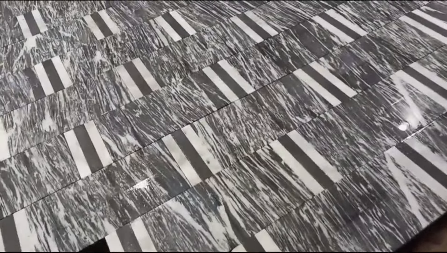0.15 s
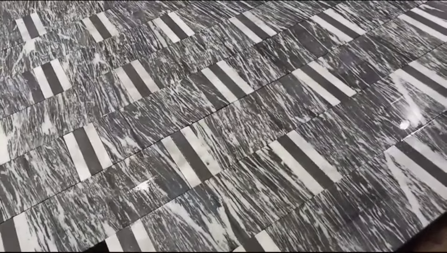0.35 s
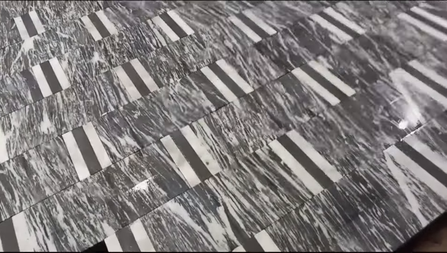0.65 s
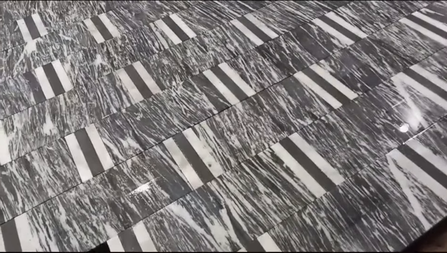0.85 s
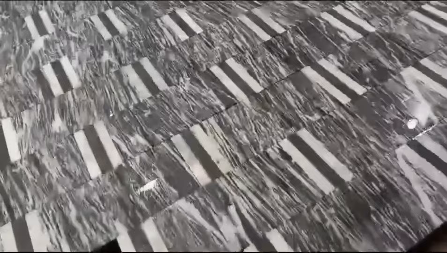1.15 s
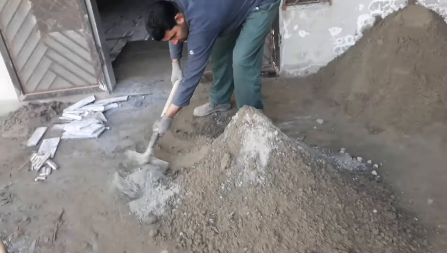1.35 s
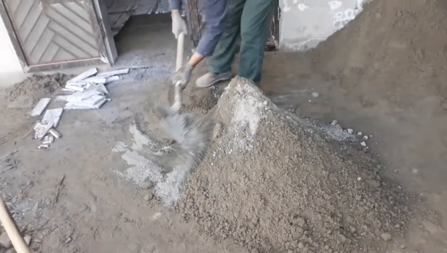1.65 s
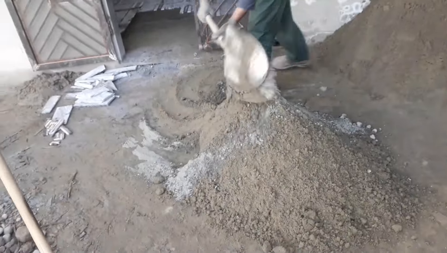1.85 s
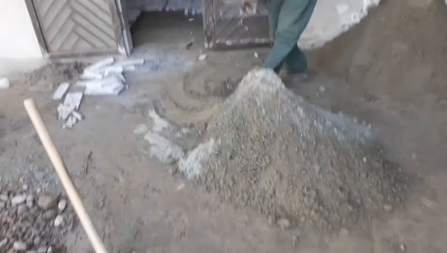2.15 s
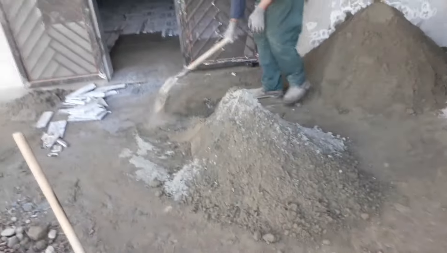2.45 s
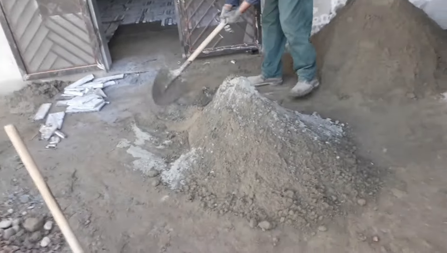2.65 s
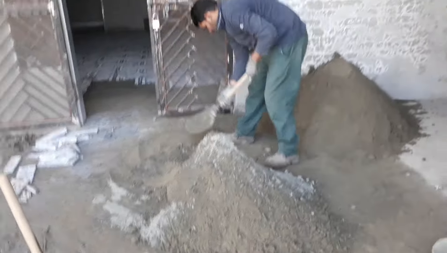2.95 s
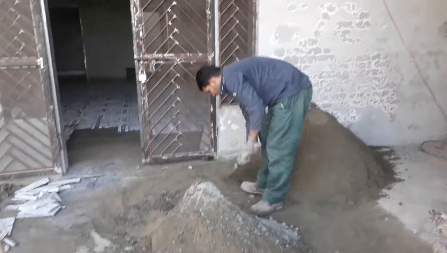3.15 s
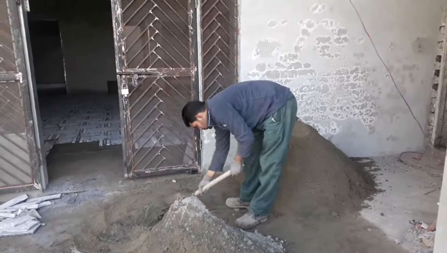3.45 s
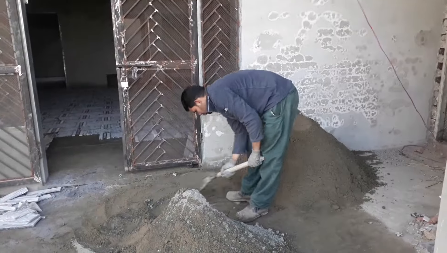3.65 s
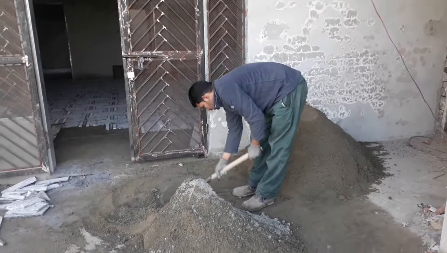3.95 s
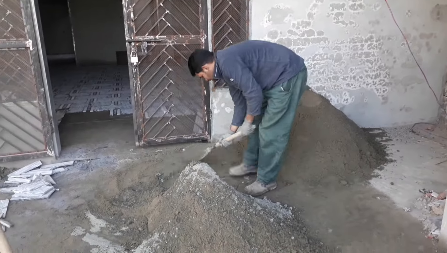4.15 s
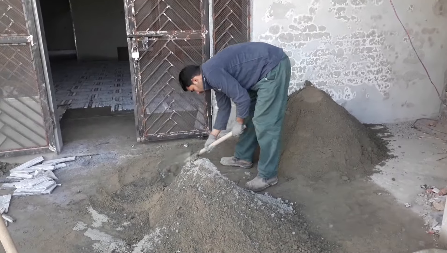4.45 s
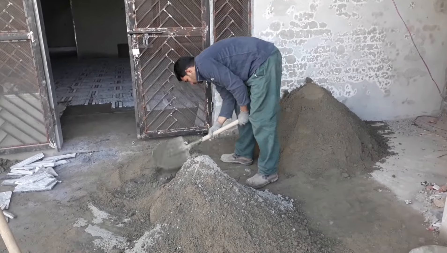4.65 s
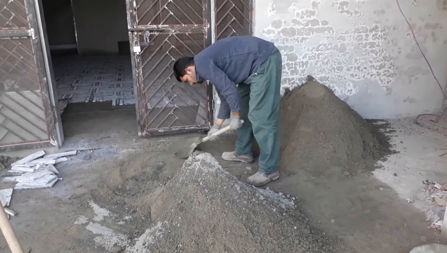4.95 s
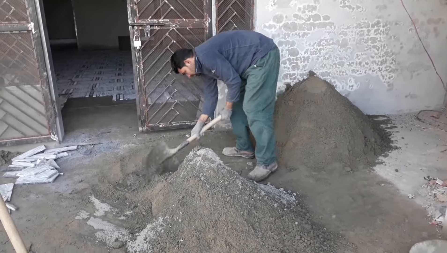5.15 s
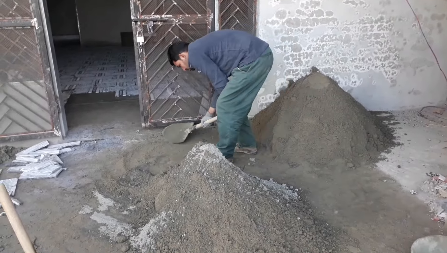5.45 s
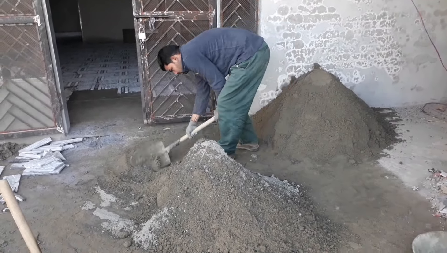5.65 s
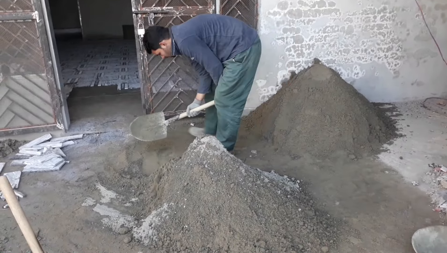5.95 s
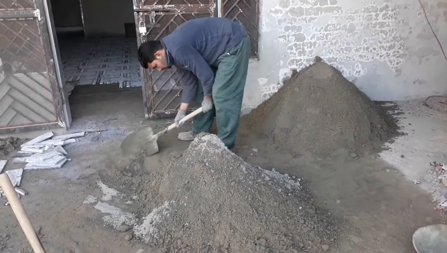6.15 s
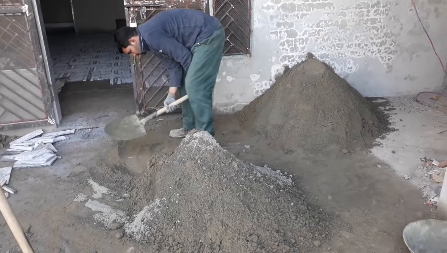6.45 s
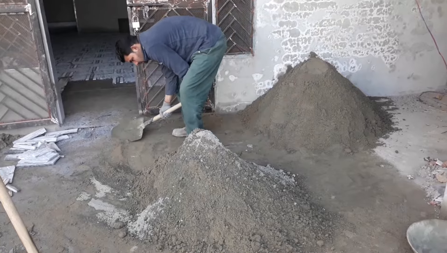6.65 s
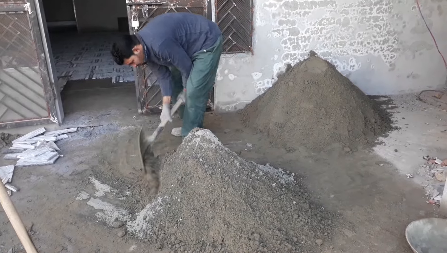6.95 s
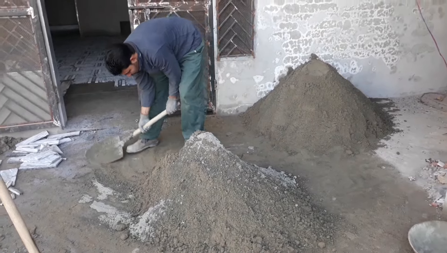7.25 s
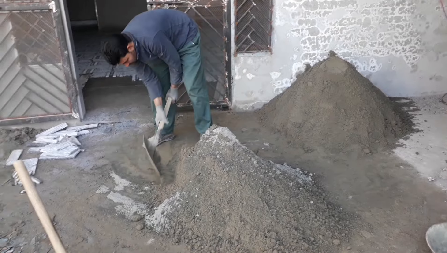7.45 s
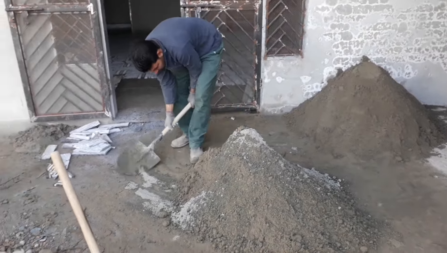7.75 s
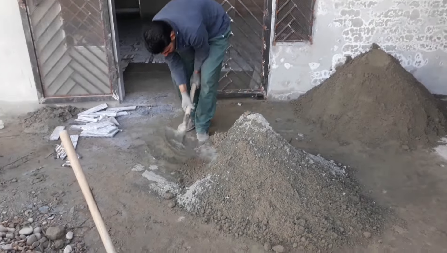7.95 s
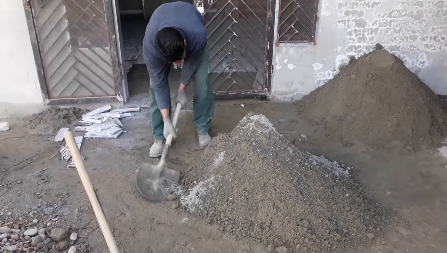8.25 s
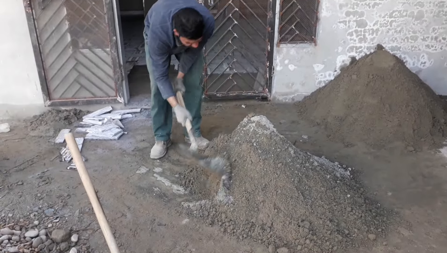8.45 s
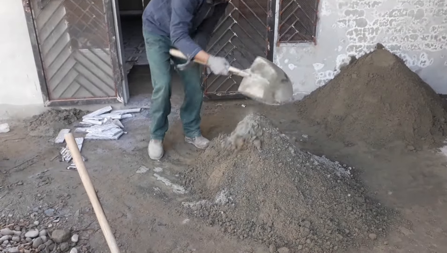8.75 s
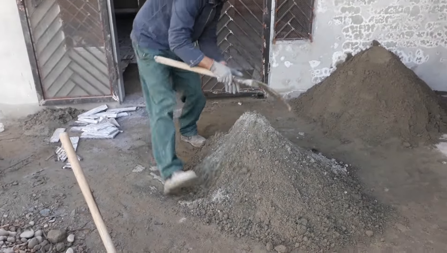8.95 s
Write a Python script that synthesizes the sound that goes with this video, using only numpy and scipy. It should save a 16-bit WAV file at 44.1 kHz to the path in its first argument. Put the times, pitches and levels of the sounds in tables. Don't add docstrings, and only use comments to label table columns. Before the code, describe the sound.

A very quiet tiled room with a faint footstep and rustle lasts about a second, then cuts to a walled building yard. A steel shovel scrapes briefly, a plank knocks hard and bounces, sand pours, then regular harsh gritty strokes ring the blade on concrete, strongest in the middle. Sand slides softly between them. Close small microphone, short yard echo, faint distant site noise.

```python
import sys
import numpy as np
from scipy import signal
from scipy.fft import rfft, irfft, next_fast_len
from scipy.io import wavfile

SR = 44100
rng = np.random.default_rng(int(sys.argv[2]) if len(sys.argv) > 2 else 0)


def nominal_scale(level):
    x = np.asarray(level, float) / 20
    return 10 ** x


def unload_audio(sound):
    columns = np.transpose(np.atleast_2d(sound))
    steps = np.round(np.clip(columns, -1, 1) * 32767)
    wavfile.write(sys.argv[1], SR, steps.astype(np.int16))


N = 400869

# time_s, grit_db, blade_body_rel_db, blade_low_rel_db
STROKES = [
    [(1.226, -55, 14, -1), (1.244, -45, 3.5, -1), (1.37, -42.5, 5.5, 2), (1.48, -49.5, 15, 0.5),
     (1.5, -76, 1, -6)],
    [(3.22, -37, -13, 12), (3.23, -50.5, 2, 3), (3.308, -35, 3, -10), (3.448, -32.5, 0, -8.5),
     (3.52, -54, 11, -10)],
    [(3.75, -29, 0.5, -2.5), (3.76, -52, 9, -6), (3.802, -28.5, -1, -33), (3.948, -30, 0.5, -12),
     (4.01, -45, -4, -11)],
    [(4.26, -53, -2, 8), (4.318, -36.5, 0, -9), (4.436, -31.5, 4, 1), (4.544, -36, 5, -15),
     (4.558, -29.5, -5, -28), (4.6, -52, 2, -2)],
    [(4.87, -41, 6, -11), (4.876, -50, 2, -8), (4.888, -31.5, 0.5, -7), (5.108, -32, 2, -3),
     (5.15, -52, -3, -18)],
    [(5.43, -20.5, -24, -11), (5.438, -38, 3, -7), (5.484, -33.5, -0.5, -9.5), (5.666, -30, 4, 0.5),
     (5.704, -27, 0, -7), (5.75, -56, 9, -2)],
    [(6.065, -36, -3, -12), (6.115, -35, 3.5, -1), (6.201, -31.5, -3, -2.5), (6.267, -31, 1, 0.5),
     (6.33, -59, 9, -18)],
    [(6.61, -46, 2, -7), (6.64, -42.5, 4.5, -17), (6.664, -35.5, 2, -6.5), (6.824, -31.5, 1.5, 0),
     (6.852, -32.5, 0, -2.5), (6.93, -53.5, 10, -9)],
    [(7.23, -45.5, -8, -14), (7.29, -42, 10, -4), (7.33, -37, 4, -0.5), (7.398, -30, -2, -5.5),
     (7.47, -55, 6, -21)],
    [(7.705, -48.5, -9, 0), (7.765, -40, 3, -6), (7.819, -31, 4.5, 1.5), (7.853, -32, 3.5, -19),
     (7.92, -61, -1, -2)],
    [(8.11, -48.5, -3, -4), (8.202, -32, 1.5, -9), (8.272, -34, 0, -6), (8.362, -46, -2, -2),
     (8.39, -73, 6, -5)],
]
# start_s, peak_db, thud_rel_db, low_rel_db, bright_rel_db, dies_s
JOLTS = [(1.357, -25, -14, 2, -17, 0.12), (1.449, -18, -24, -28, -32, 0.08),
         (2.0887, -37.5, -37, -3, -28, 0.097), (2.2424, -43, 4, 15, 1, 0.044),
         (3.2115, -20, -1, -5, -3, 0.05), (3.2794, -17.5, -54, -18, -3, 0.068),
         (3.7448, -18, -3, -4, 1, 0.041), (3.7753, -21, -10, -23, 4, 0.033),
         (3.7988, -16, -21, -27, -7, 0.021), (3.8397, -15.5, -12.5, -18, -11, 0.15),
         (3.896, -22, -15, -1.5, -15, 0.15), (3.9174, -16.5, -40, -21, -5, 0.15),
         (4.251, -24, -1, -14, -11, 0.068), (4.3077, -19, -31, -27, -12, 0.071),
         (4.3324, -13.5, -35, -21, -11, 0.087), (4.5187, -15, -37, -3, -0.5, 0.074),
         (4.8653, -22, -26, -26, -1, 0.047), (4.8864, -12, -31, -18, -5, 0.037),
         (4.9394, -9, -32, -23, -11, 0.065), (4.9826, -10, -21, -16, -11, 0.04),
         (5.423, -9.5, -33, -14, -1, 0.035), (5.6374, -7, -33, -8, -12, 0.039),
         (6.1879, -6, -15.5, -11, -3, 0.052), (6.6037, -25.5, 7, 5.5, -4, 0.027),
         (6.626, -23, -17, -19, -6, 0.065), (6.7371, -22, -22, -12, 4, 0.056),
         (7.227, -20, -4, -7.5, 4.5, 0.028), (7.277, -19.5, -26, -24, -16, 0.078),
         (7.4006, -15, -24, -32, -5, 0.08), (7.6988, -32, 14.5, 1, -6, 0.047),
         (7.7385, -23.5, -13, -15, -2, 0.055), (7.788, -19.5, -24, -17, 2, 0.11),
         (8.106, -24, -19, -16, -10, 0.063), (8.1244, -26, -22, -23, -10, 0.059),
         (8.1623, -15, -12, -22, -18, 0.05), (8.2297, -16, -24, -11.5, -12, 0.15),
         (8.2544, -16, -33, -22, -9, 0.15), (8.9904, -39.5, 1, -16, -5, 0.045)]
SCRAPE_EDGES_HZ = [60, 480, 1200, 4500, 16000]
# pitch_hz, width_hz, level_db
BLADE_MODES = [(677.7, 37, -5.5), (844.6, 32, 0.5), (1363, 56, -8.5), (1659, 59, -0.5), (2119, 84, 2),
               (2448, 120, -1), (3250, 210, -14.5), (3990, 58, -9.5), (4790, 50, -30), (6800, 550, -3)]
# pitch_hz, level_db (per Hz)
GRIT_COLOUR = [(35, -50), (60, -30), (164, -18.5), (566, -13.5), (682, -5.5), (1060, -7.5), (2470, -1.5),
               (2770, -2.5), (4530, -5.5), (7060, -6.5), (9570, -19.5), (12100, -21), (16000, -35)]
# time_s, hiss_db, coarse_rel_db, dust_rel_db
SAND_FALLS = [
    [(1.5, -62, 11, -17), (1.604, -65, 22, -18), (1.628, -58, 12, -17), (1.966, -65, 8, -19),
     (2.164, -76, 14, -9), (2.198, -48.5, -13, -8), (2.278, -67.5, 19, -10), (2.318, -72, 6, -10)],
    [(2.52, -62, 2, -14), (2.54, -45, 16.5, -19), (2.674, -53.5, 12, -7), (2.884, -50, 2, 0),
     (3.032, -38, 6, -21), (3.13, -61, 5, -1), (3.2, -68, 0, -2)],
    [(6.36, -63, 8, -14), (6.508, -63, 5, 3), (6.544, -52.5, 1, -13), (6.59, -67, 25, 5)],
    [(6.96, -58, 27, -16), (7.092, -65, 10, -8), (7.12, -54.5, 6, -2), (7.21, -59, 6, -11)],
    [(7.5, -68, 6, -16), (7.616, -77, 8, -9), (7.682, -55, 0, -3), (7.69, -75, 1, -7)],
    [(7.94, -73, 7, -21), (8.01, -62, 17, -19), (8.03, -59, 9, -22), (8.09, -56, 15, -22)],
    [(8.42, -72, 0, -11), (8.478, -72, 1, -11), (8.636, -62.5, 2, -14), (8.676, -46.5, -8, 13),
     (8.832, -72, -13, -7), (8.968, -72, 13, 2), (9.09, -48, -8, 2)],
]
# pitch_hz, level_db (per Hz)
SAND_COLOUR = [(1500, 10), (2800, 6), (3600, 0.5), (4300, -3), (5300, -14), (7100, -2.5), (8000, -18.5),
               (8600, -19), (11700, -6), (15500, -8)]
# start_s, blow_db, hardness_hz, clatter_db, clatter_dies_s
KNOCKS = [
    (2.3343, -8, 7000, -15.5, 0.067),
    (2.3368, -12, 1500, -17, 0.095),
    (2.347, -9, 910, -29, 0.38),
    (2.531, -27, 4960, -26.5, 0.11),
    (2.538, -19, 3000, -28, 0.12),
    (2.547, -16, 1250, -29.5, 0.34),
    (2.629, -35, 4000, -37, .1),
]
# pitch_hz, level_db, t60_s
PLANK_MODES = [(163, -4.5, 0.068), (210, -3.5, 0.088), (293, -8.5, 0.059), (505, -10.5, 0.039),
               (567, -3.5, 0.091), (610, 3.5, 0.074), (783, -5, 0.047), (1082, -14, 0.057),
               (1440, -16, 0.042), (1546, -9, .07), (2300, 3, 0.017), (2520, 6, 0.015), (4020, -1.5, 0.019),
               (6960, -0.5, .012)]
# pitch_hz, level_db (per Hz)
CLATTER_COLOUR = [(41, -40), (70, -10.5), (308, -5.5), (403, -17), (578, -1), (969, -14.5), (1550, -16),
                  (1820, -18.5), (6830, -25), (15000, -52)]
# start_s, pitch_hz, level_db, t60_s
PINGS = [
    (1.98, 4800, -64, .1),
    (2.0, 2800, -64, .1),
    (2.03, 3100, -60, .3),
    (2.091, 2891, -57, 30.0),
    (8.9, 4000, -63, .4),
    (8.95, 3850, -59, .4),
    (8.975, 2500, -54, .25),
]
# time_s, rumble_db
RUMBLE = [
    [(1.24, -56), (1.336, -56), (1.35, -34.5), (1.458, -53.5), (1.55, -82)],
    [(2.85, -52.5), (2.926, -58), (2.984, -44), (3.13, -67), (3.15, -65)],
]
# time_s, level_db
SWISH = [
    (2.88, -60),
    (2.992, -37),
    (3.036, -38),
    (3.076, -42),
    (3.11, -74),
]
# pitch_hz, width_hz, level_db
SOLE_MODES = [(3620, 650, 1.2), (7280, 610, 1)]
# time_s, level_db, pitch_hz
CHIRP = [
    (4.117, -77, 5560),
    (4.125, -45, 6200),
    (4.147, -45, 6080),
    (4.15, -59, 5970),
    (4.16, -48, 5900),
    (4.2, -66, 5800),
]
# pitch_hz, t60_s, level_db
YARD_ECHO = [(116, 0.72, -19.5), (370, 0.79, -18.5), (1080, 0.82, -17), (2270, 0.8, -18.5),
             (4860, 0.46, -17.5), (7000, 0.15, -31), (11900, 0.55, -37)]
# pitch_hz, level_db (per Hz)
SITE_COLOUR = [(15, -36), (25, -17), (49, -8), (157, 1.5), (363, -1), (503, -9), (1230, -6.5), (1440, -8.5),
               (5570, -17.5), (6920, -17.5), (9320, -29), (14800, -29), (16000, -38)]
# time_s, rustle_db, hum_rel_db
INDOORS = [(0.0, -68, -2), (0.116, -80, -1), (0.196, -77, 0), (0.204, -71.5, -11), (0.264, -80.5, 3),
           (0.354, -75, 6), (0.364, -58, 2.5), (0.524, -75.5, 0), (0.562, -73, 4), (0.654, -85, 5),
           (0.892, -82.5, 4), (0.914, -89, 19), (1.1, -84, -4), (1.11, -91, 19)]
# pitch_hz, level_db (per Hz)
RUSTLE_COLOUR = [(350, -48), (600, -13), (1160, -12), (2070, -8.5), (2540, -13), (5120, -19.5), (8050, -33),
                 (8990, -31), (16000, -58)]
# pitch_hz, level_db (per Hz)
HUM_COLOUR = [(15, -51), (25, -21), (64, -6), (109, 1.5), (494, -11), (549, -10), (900, -24), (1170, -48),
              (1980, -120)]
# start_s, thud_hz, thud_db, t60_s, scuff_db
STEPS = [
    (0.362, 172, -49, 0.18, -59),
    (0.922, 148, -71, 0.12, -78),
    (1.125, 104, -47, 0.44, -65),
]
# start_s, pitch_hz, level_db, t60_s
SQUEAKS = [
    (.004, 1495, -76, .5),
    (.385, 8750, -74, .08),
    (.365, 2000, -66, .3),
    (.535, 3050, -74, .35),
]

SITE_DB = -54
THUD_END_S, ROOM_END_S, SITE_START_S, FADE_IN_S = 1.15, 1.197, 1.224, 0.015
MIC_LOW_HZ, MIC_TOP_HZ = 32, 15800


def shovel():
    live, grit_db, body_db, low_db = in_time(STROKES)
    chatter = nominal_scale(2.11 * drift(31.7) + 1.23 * drift(113))
    range_db = (low_db - 10, low_db - 4.0, body_db - 2.0, -1.5)
    power = [live * (nominal_scale(grit_db + rel) * chatter) ** 2 for rel in range_db]
    for s, db, thud, low, bright, dies_s in JOLTS:
        for total, rel, longer in zip(power, (thud, low, 0, bright), (1.6, 0.71, 0.71, 0.6)):
            add_power(total, s - .0015, max(dies_s, .005) * longer, .003, nominal_scale(db - 6.5 + rel))
    grit = colour(grains(per_s=9000, spread_db=3.0), GRIT_COLOUR)
    ranges = [rms_one(band(grit, a, b)) for a, b in zip(SCRAPE_EDGES_HZ, SCRAPE_EDGES_HZ[1:])]
    direct = sum((-1) ** k * np.sqrt(p) * x for k, (p, x) in enumerate(zip(power, ranges)))
    return nominal_scale(-3.5) * direct + blade(direct)


def blade(drive):
    main = np.zeros(N)
    for hz, width_hz, db in BLADE_MODES:
        main += resonate(drive * nominal_scale(db + 1.5 + 2.25 * drift(21.4)), hz, width_hz)
    small = np.zeros(N)
    small_hz = np.geomspace(1000, 13000, num=24) * nominal_scale(rng.normal(0, .2, size=24))
    for k, hz in enumerate(small_hz):
        small += (-1) ** k * resonate(drive * nominal_scale(5.35 * drift(30)), hz, 30 + .025 * hz)
    return main + nominal_scale(-8.5) * small


def sand():
    live, hiss_db, coarse_db, dust_db = in_time(SAND_FALLS)
    fall = colour(grains(per_s=12000, spread_db=3.0), SAND_COLOUR)
    coarse = rms_one(band(fall, 1500, 5200))
    fine = rms_one(band(fall, 5200, 8600))
    dust = rms_one(band(fall, 8600, 16000))
    mixture = fine - nominal_scale(coarse_db - 11.0) * coarse - nominal_scale(dust_db - 11.2) * dust
    return live * nominal_scale(hiss_db + 2.8 * drift(42)) * mixture


def plank():
    force, power = np.zeros(N), np.zeros(N)
    for s, db, hard_hz, clatter_db, dies_s in KNOCKS:
        softening = signal.butter(2, hard_hz, fs=SR, output="sos")
        click = signal.sosfilt(softening, np.arange(400) == 0)
        force[round(s * SR):][:len(click)] += nominal_scale(db) * click
        add_power(power, s, dies_s, .0015, nominal_scale(clatter_db + 1.5))
    wood = sum((-1) ** k * nominal_scale(db - 7) * ring(force, hz, t60) for k, (hz, db, t60) in enumerate(PLANK_MODES))
    clatter = colour(grains(per_s=10000, spread_db=3.5), CLATTER_COLOUR)
    return band(wood, 95, 10000) + np.sqrt(power) * clatter


def pings():
    t = np.arange(N) / SR
    knock_s = KNOCKS[0][0]
    out = np.zeros(N)
    for s, hz, db, t60 in PINGS:
        undamped = (t < knock_s) | (s > knock_s)
        out += nominal_scale(db) * burst(s, t60, rise_s=0.0017) * undamped * np.sin(2 * np.pi * hz * t)
    return out


def boots():
    shifting, rumble_db = in_time(RUMBLE)
    moving, swish_db = in_time([SWISH])
    dust = grains(per_s=20000, spread_db=5.5)
    sole = np.zeros(N)
    for hz, width_hz, db in SOLE_MODES:
        sole += nominal_scale(db) * rms_one(resonate(resonate(dust, hz, width_hz), hz, width_hz))
    rumble = rms_one(band(rng.standard_normal(N), 176, 430))
    return shifting * nominal_scale(rumble_db - 1.5) * rumble + moving * nominal_scale(swish_db - 3.5) * sole


def sparrow():
    live, db, hz = in_time([CHIRP])
    warble_hz = 250 * np.sin(2 * np.pi * 150 * np.arange(N) / SR)
    return live * nominal_scale(db) * np.sin(2 * np.pi * np.cumsum(hz + warble_hz) / SR)


def yard(x):
    t = np.arange(int(1.5 * SR)) / SR
    echo = np.zeros(len(t))
    for hz, t60, db in YARD_ECHO:
        noise = rms_one(band(rng.standard_normal(len(t)), hz / 1.516, hz * 1.573))
        echo += nominal_scale(db - 60 * t / t60) * noise / np.sqrt(t60 * SR / 14)
    first_wall = np.clip((t - .008) / 0.0067, 0, 1)
    return signal.fftconvolve(x, echo * first_wall)[:N]


def distant_site():
    return nominal_scale(SITE_DB + 0.47 * drift(24)) * colour(rng.standard_normal(N), SITE_COLOUR)


def indoors():
    live, rustle_db, hum_db = in_time([[*INDOORS, (ROOM_END_S, *INDOORS[-1][1:])]])
    rustle = colour(rng.standard_normal(N), RUSTLE_COLOUR)
    hum = colour(rng.standard_normal(N), HUM_COLOUR)
    out = nominal_scale(rustle_db + .8 * drift(30)) * (rustle + nominal_scale(hum_db) * hum)
    t = np.arange(N) / SR
    for s, hz, db, t60, scuff_db in STEPS:
        thud = nominal_scale(db) * np.sin(2 * np.pi * hz * (t - s))
        out += burst(s, t60, rise_s=0.0012) * (thud + nominal_scale(scuff_db) * rustle) * (t < THUD_END_S)
    friction = rng.standard_normal(N)
    for s, hz, db, t60 in SQUEAKS:
        out += nominal_scale(db) * burst(s, t60, rise_s=0.0036) * rms_one(resonate(friction, hz, .06 * hz))
    return out


def rms_one(x):
    return x / np.sqrt(np.mean(x ** 2) + 1e-20)


def in_time(spans, lead_s=.007, tail_s=.03):
    t = np.arange(N) / SR
    rows, live = [], np.zeros(N, bool)
    for span in spans:
        first, last = span[0], span[-1]
        start_s, end_s = first[0] - lead_s, last[0] + tail_s
        rows += [(start_s, first[1] - 30, *first[2:]), *span, (end_s, last[1] - 25, *last[2:])]
        live |= (t > start_s) & (t < end_s)
    s, *columns = np.transpose(rows)
    return [live] + [np.interp(t, s, c) for c in columns]


def band(x, low_hz, high_hz):
    edges_hz = [low_hz, min(high_hz, .45 * SR)]
    return signal.sosfilt(signal.butter(2, edges_hz, "band", fs=SR, output="sos"), x)


def colour(x, spectrum):
    hz, db = np.transpose(spectrum)
    size = next_fast_len(N)
    grid_hz = np.arange(size // 2 + 1) * SR / size + 1
    gain = nominal_scale(np.interp(np.log(grid_hz), np.log(hz), db))
    return rms_one(irfft(rfft(x, size) * gain, size)[:N])


def drift(rate_hz):
    r = np.exp(-32 * np.pi * rate_hz / SR)
    noise = rng.standard_normal(N // 16 + 3002)
    slow = signal.lfilter([1], [1, -2 * r, r * r], noise)[3000:]
    return np.interp(np.arange(N) / 16, np.arange(len(slow)), rms_one(slow))


def grains(per_s, spread_db):
    sizes = nominal_scale(spread_db * np.minimum(rng.exponential(1, N), 5)) * rng.choice([-1, 1], N)
    return sizes * (rng.random(N) < per_s / SR)


def ring(x, hz, t60):
    r, w = nominal_scale(-60 / (t60 * SR)), 2 * np.pi * hz / SR
    return signal.lfilter([0, np.sin(w)], [1, -2 * r * np.cos(w), r * r], x + 1e-18)


def resonate(x, hz, width_hz):
    r = np.exp(-np.pi * width_hz / SR)
    poles = [1, -2 * r * np.cos(2 * np.pi * hz / SR), r * r]
    return signal.lfilter([(1 - r * r) / 2, 0, (r * r - 1) / 2], poles, x + 1e-18)


def burst(s, dies_s, rise_s):
    t = np.clip(np.arange(N) / SR - s, 0, 3 * dies_s)
    return (1 - np.exp(-t / rise_s)) * nominal_scale(-60 * t / dies_s) * (t < 3 * dies_s)


def add_power(total, s, dies_s, rise_s, gain):
    t = np.arange(int(2 * dies_s * SR)) / SR
    at = round(s * SR)
    envelope = gain * (1 - np.exp(-t / rise_s)) * nominal_scale(-60 * t / dies_s)
    total[at:at + len(t)] += (envelope ** 2)[:N - at]


def scene():
    t = np.arange(N) / SR
    work = shovel() + sand() + boots() + sparrow()
    near = plank() + pings()
    site = work + near + yard(work + nominal_scale(-5) * near) + distant_site()
    fade_in = np.clip((t - SITE_START_S) / FADE_IN_S, 0, 1)
    return (indoors() * (t < ROOM_END_S) + site * fade_in)[None]


def low_pass(x):
    return signal.sosfilt(signal.butter(12, 16510, fs=SR, output="sos"), x)


def record(dry):
    bass_loss = signal.butter(1, MIC_LOW_HZ, "high", fs=SR, output="sos")
    top_loss = signal.cheby2(14, 45, MIC_TOP_HZ, fs=SR, output="sos")
    heard = signal.sosfilt(top_loss, signal.sosfilt(bass_loss, dry))
    return low_pass(heard)


dry = scene()
out = record(dry)
unload_audio(out)
```